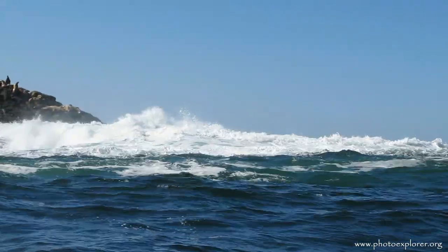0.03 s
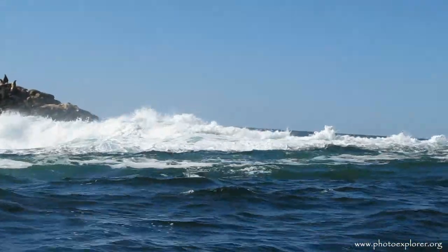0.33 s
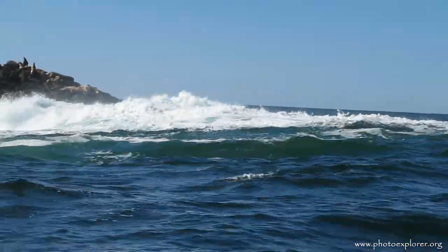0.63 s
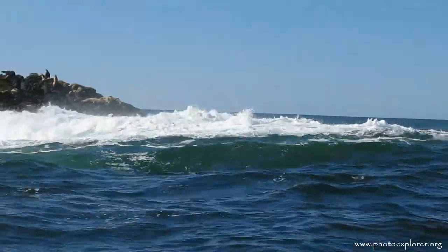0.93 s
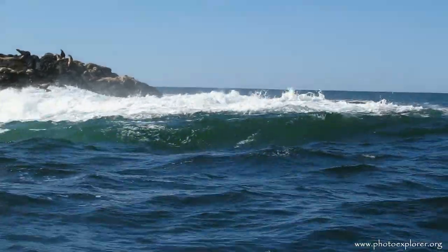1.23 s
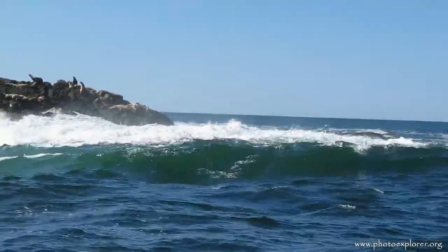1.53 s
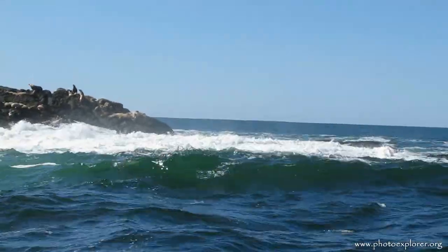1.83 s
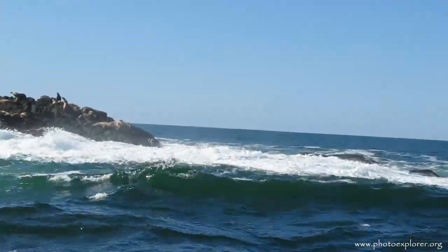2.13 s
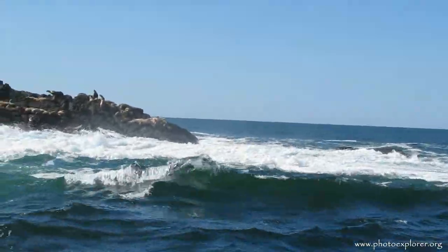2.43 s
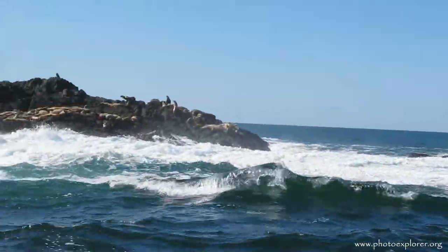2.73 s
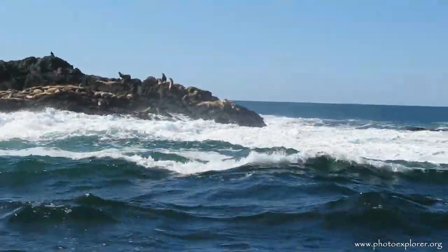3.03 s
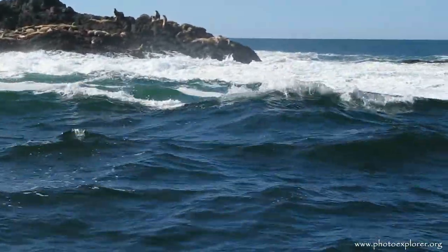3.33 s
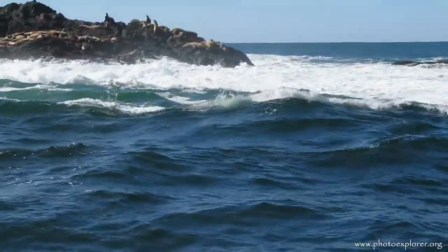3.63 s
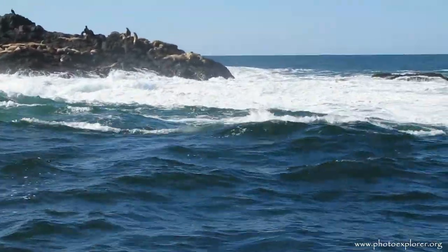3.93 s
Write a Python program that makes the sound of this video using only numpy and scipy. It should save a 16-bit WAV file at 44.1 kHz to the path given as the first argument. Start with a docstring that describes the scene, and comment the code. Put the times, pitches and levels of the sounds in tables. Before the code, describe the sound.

A small boat's engine idles with a low throb at sea, near surf breaking on rocks. Waves wash, slap and gulp against the hull, growing busier in the second half, while wind buffets the microphone.

```python
"""Small boat idling near surf

A small boat idles on a swell, off rocks where the surf breaks. Its engine throbs with each
firing, and the propeller hums. Waves wash along the hull, slap it, throw spray and gulp as
they trap air. Wind buffets the two microphone ports, and a faint squeal sounds early on."""
import sys
import numpy as np
from scipy import signal
from scipy.fft import rfft, irfft
from scipy.io import wavfile
from scipy.ndimage import uniform_filter1d

SR = 44100
rng = np.random.default_rng(int(sys.argv[2]) if len(sys.argv) > 2 else 0)


def int16_out(signal):
    """Quantize to a 16-bit WAV file."""
    q = np.round(np.clip(np.atleast_2d(signal).T, -1, 1) * 32767)
    wavfile.write(sys.argv[1], SR, q.astype(np.int16))


N = 176400
T = np.arange(N) / SR

# Engine speed. Each row: time in seconds, firings per second.
FIRING_RATE = [(0, 35.3), (.65, 35.9), (.8, 36.5), (.95, 36.2), (1.1, 36.45), (1.75, 36.25), (2.15, 36.45),
               (2.3, 36.8), (2.75, 36.8), (3.1, 36.55), (3.35, 36.1), (4, 36.0)]
# The exhaust as the boat rolls. Each row: time in seconds, then dB of harmonics 1, 2, 3 and 4.
EXHAUST_HARMONICS = [(0, -38, -23.5, -31, -37), (.25, -29, -19, -37, -35), (.58, -25, -19, -32, -37.5),
                     (.7, -27, -22.5, -21.5, -46), (.85, -24, -25, -25.5, -36.5), (1.1, -20, -22, -28, -38),
                     (1.35, -17.3, -22, -25.5, -35.5), (1.6, -16.5, -19.5, -28.5, -36.5),
                     (2, -24.5, -20, -47, -33), (2.3, -25.5, -17, -41, -33), (2.6, -22, -18, -25, -33.5),
                     (2.95, -22, -16, -31.5, -35.5), (3.15, -24.5, -21.5, -24, -32),
                     (3.4, -27, -21, -34, -33.5), (3.6, -22.5, -22.5, -24.5, -39),
                     (4, -20, -20, -29.5, -56)]
# Propeller and gear tones. Each row: multiple of the firing rate, level in dB before the load gain.
PROPELLER_TONES = [(4.25, -38.5), (4.76, -32), (5.25, -40.5), (5.8, -42.5), (21.35, -43.5), (30.2, -50.5),
                   (31.1, -52.5)]
# Waves along the hull. Each row: peak time, rise and fall in seconds, wash in dB, spray in dB,
# left minus right in dB.
WAVES = [(.32, 0.28, 0.079, -50, -60, -5), (.66, 0.058, 0.023, -38, -47.5, -1),
         (.765, 0.077, 0.057, -40, -40.5, 3.5), (1.02, 0.072, .06, -50, -55, 0),
         (1.37, 0.06, 0.042, -38.5, -48.5, 0), (2.09, 0.03, 0.059, -30.5, -43, -1.5),
         (2.225, .05, 0.034, -34.5, -48, 0), (2.36, 0.022, 0.02, -36, -62, -3),
         (2.75, 0.25, 0.23, -34.5, -63, -1.5), (2.9, 0.053, 0.06, -39, -56, 2),
         (3.03, 0.13, 0.064, -34.5, -47, -1.5), (3.35, 0.048, 0.095, -38, -45, -2),
         (3.58, 0.048, .08, -33, -39, -2.5), (3.71, 0.06, 0.12, -29.5, -37.5, -0.5),
         (3.8, 0.042, 0.06, -33, -42, -4)]
# Slaps on the hull. Each row: start in seconds, level in dB, pitch in Hz, width in octaves,
# seconds to the peak.
SLAPS = [(.215, -38.5, 1800, .12, .008), (0.641, -32, 770, 0.54, 0.026), (.705, -37, 2200, 0.8, 0.0054),
         (0.757, -30, 710, 0.38, 0.015), (0.972, -30, 390, .8, 0.033), (1.335, -29.5, 1920, 0.32, 0.0022),
         (2.012, -25.5, 320, 0.33, 0.013), (2.109, -32, 400, 0.46, .01), (2.142, -26.5, 332, .6, 0.01),
         (3.019, -35, 2980, 0.87, 0.011), (3.028, -22.5, 517, 1.1, .006), (3.272, -25.5, 380, 0.63, .016),
         (3.307, -27, 595, 0.81, 0.01), (3.566, -34.5, 3000, 0.56, .016), (3.67, -33, 400, 0.9, 0.062),
         (3.788, -37, 3500, 0.82, 0.0066)]
# Big bubbles. Each row: start in seconds, peak in dB, starting pitch in Hz, length in seconds.
GULPS = [(1.365, -31, 660, 0.017), (1.943, -23.5, 706, 0.01), (3.029, -16.5, 350, 0.01),
         (3.034, -30, 680, 0.01), (3.712, -13.5, 730, 0.01), (3.806, -13, 269, 0.014)]
# Single drops. Each row: start in seconds, level in dB, left minus right in dB.
DROPS = [(.734, -33, 2), (.977, -37, 0), (1.384, -42, 0), (1.4336, -35, 2.5), (2.231, -35, 0),
         (2.565, -38, 0), (2.66, -38, 0)]
# The squeal's two notes. Each row: pitch in Hz, level in dB before the squeal gain.
SQUEAL_TONES = [(2665, -47.5), (3385, -47.5)]
# How sounds grow and fade. Each row: time in seconds, gain in dB.
LOAD_GAIN = [(0, -4.5), (.7, 0.5), (1.2, -1), (1.85, -0.5), (2.15, 3.5), (2.6, 3.5), (3.05, 4.5),
             (3.35, -0.5), (3.55, -2), (4, -4)]  # for the propeller and the wake
WIND_GAIN = [(0, 2.5), (.35, 3), (.5, -0.5), (.67, 5.5), (.9, 3), (1.2, 1.5), (1.9, -1), (2.3, 1.5),
             (2.5, 4), (2.8, -2), (3.1, 6), (3.22, 11), (3.4, 8.5), (3.57, 5), (3.72, 8.5), (4, 4.5)]
SURF_GAIN = [(0, 1), (.3, 3.5), (.9, 3), (1.15, 0.5), (1.6, 4), (1.76, 1.5), (2.3, 5.5), (2.7, 3.3),
             (3.2, 6), (3.5, 5.5), (4, 7.5)]
SQUEAL_GAIN = [(.18, -25), (.22, -2), (.37, 2), (.45, -9), (.63, 0.5), (.72, -1.5), (.85, -40)]
# The colour (bass to treble) of each noise. Each row: frequency in Hz, relative level in dB.
WAKE_COLOUR = [(20, -6), (50, -6.5), (90, 2.5), (170, -4.5), (250, -4), (400, -10.5), (640, -16),
               (880, -11), (1140, -14.5), (1320, -23.5), (2500, -28), (8000, -60)]
WASH_COLOUR = [(100, -25), (350, 7), (900, 0), (2200, -1), (4000, -6.5), (6000, -20), (9000, -23.5),
               (15000, -41)]
SPRAY_COLOUR = [(1000, -15), (3500, 5.5), (7000, 1.5), (9000, -1.5), (11000, -2), (13000, -6), (14500, -13),
                (15700, -30)]
DROP_COLOUR = [(500, -25), (3000, -8), (6000, -4), (10500, 2), (13000, -11), (15500, -34)]
WIND_COLOUR = [(10, -37), (23, -9), (35, -0.5), (70, -4), (130, -2.5), (250, -14.5), (450, -26),
               (1000, -38), (4000, -71)]
SURF_COLOUR = [(100, -24), (500, 6.5), (1300, 1), (2400, -3), (4000, -5.5), (6000, -11.5), (9000, -18),
               (12000, -24), (15500, -39)]
CREST_COLOUR = [(2000, -20), (4500, -2), (6000, 2), (7800, -2), (9500, -11), (12000, -27), (15000, -42)]
# How the two ports hear the sea. Each row: frequency in Hz, likeness (1 means alike),
# how far left leads in radians, left minus right in dB.
PORTS = [(96, 1, 0.98, -2.5), (620, 0.93, -0.6, 0.8), (1060, 0.94, 1, 1.5), (1460, 0.46, .5, 1),
         (1870, 0.27, -0.7, -4), (2600, 0.16, -1, 0), (3930, 0.08, -1, 2.5), (5440, .03, -0.5, 3),
         (7100, 0.19, -3, 1.5), (9200, 0.13, -1, 4), (10400, 0.47, -1.9, 1.3), (12500, 0.15, 1.5, 1),
         (13700, .04, 1, 0)]


def exhaust(firing_phase, db_per_octave=-10, waver_db=2, skew_rad=0.72, smear_rad=0.1145):
    """Each firing makes one lopsided pulse; the roll of the boat changes its colour."""
    *levels_db, fourth_db = curves(EXHAUST_HARMONICS)
    for k in range(4, 14):
        levels_db.append(fourth_db + db_per_octave * np.log2(k / 4) + waver_db * wander(10))
    pulses = np.zeros(N)
    for k, db in enumerate(levels_db, 1):
        lag = skew_rad + smear_rad * (k - 1) ** 2  # the hull delays the higher harmonics
        pulses -= amp(db) * np.cos(k * firing_phase - lag)
    return np.sqrt(2) * pulses * pan(-1.0)


def propeller(firing_phase, waver_db=0.5, drift_hz=0.78):
    """The blades hum and the gears whine, wavering but tied to the engine speed."""
    tones = np.zeros(N)
    for ratio, db in PROPELLER_TONES:
        gain = amp(db + waver_db * wander(6.4))
        tones += gain * np.sin(ratio * firing_phase + phase(drift_hz * wander(7.0)))
    return np.sqrt(2) * tones * amp(curves(LOAD_GAIN)[0]) * pan(-0.024)


def wake(firing_phase, level_db=-27.5):
    """The exhaust churns the water, which throbs with each firing."""
    churn = water_noise(WAKE_COLOUR, patchy_db=1.0, flicker_db=-0.1)
    throb = 1 + 0.12 * np.cos(firing_phase)
    return churn * throb * amp(level_db + curves(LOAD_GAIN)[0])


def waves():
    """Each wave swells along the hull as a wash with a brighter spray, both full of droplets."""
    wash_power, spray_power = np.zeros((2, 2, N))
    for peak, rise, fall, wash_db, spray_db, side_db in WAVES:
        shape = pan(side_db) * swell(peak, rise, fall)
        wash_power += (amp(wash_db) * shape) ** 2
        spray_power += (amp(spray_db) * shape) ** 2
    wash = water_noise(WASH_COLOUR, patchy_db=2, flicker_db=0.8) + amp(-6.5) * droplets(WASH_COLOUR)
    spray = water_noise(SPRAY_COLOUR, patchy_db=2.5, flicker_db=1.4) + amp(-7) * droplets(SPRAY_COLOUR)
    return np.sqrt(wash_power) * wash + np.sqrt(spray_power) * spray


def droplets(colour, per_second=2200, pitches=28, cycles=3.3, spread_db=2.5):
    """Many tiny bubbles burst, each ringing for a few cycles of a rising note."""
    out = np.zeros((2, N))
    for hz in np.geomspace(1200, 14000, pitches):
        age = np.arange(0, 6, hz / SR / cycles)
        ping = unit(age * np.exp(-2 * age) * np.sin(2 * np.pi * cycles * age * (1 + 0.015 * age)))
        sizes = amp(spread_db * np.minimum(rng.exponential(1, (2, N)), 4))
        bursts = sizes * (rng.random((2, N)) < per_second / pitches / SR)
        out += hz * amp(spectra(colour, hz)[0]) * signal.oaconvolve(bursts, ping[None], axes=1)[:, :N]
    return unit(out)


def slaps():
    """Water smacks the hull, each time with a short burst of noise around one pitch."""
    out, t = np.zeros((2, N)), T[:8192]
    hz = np.fft.rfftfreq(len(t), 1 / SR)
    for start, db, pitch, width, rise in SLAPS:
        band = np.exp(-0.5 * (np.log2((hz + 1) / pitch) / width) ** 2)
        thud = unit(irfft(rfft(rng.standard_normal(len(t))) * band))
        add(out, start, amp(db) * thud * t / rise * np.exp(1 - t / rise))
    return out


def gulps(pitch_rise=0.42):
    """Big bubbles of trapped air each ring with a quick rising note."""
    out = np.zeros((2, N))
    for start, db, pitch, length in GULPS:
        progress = np.minimum(T[:8192] / length, 1)
        note = np.sin(phase(pitch * (1 + pitch_rise * progress)))
        add(out, start, amp(db) * np.sin(np.pi * progress) * note)
    return out


def drops(decay_s=0.0015):
    """Single drops land with bright ticks."""
    out, t = np.zeros((2, N)), T[:8192]
    for start, db, side_db in DROPS:
        tick = unit(tint(rng.standard_normal((2, len(t))), DROP_COLOUR))
        add(out, start, amp(db) * pan(side_db) * tick * np.exp(-t / decay_s))
    return out


def wind(level_db=-28, lumpy_db=1.0, shared=0.82):
    """Wind buffets the ports with a lumpy rumble, mostly different at each one."""
    white = rng.standard_normal((2, N)) + shared * rng.standard_normal(N)
    lumps = amp(lumpy_db * np.array([wander(8.9), wander(13.0)]))
    return unit(tint(white, WIND_COLOUR) * lumps) * amp(level_db + curves(WIND_GAIN)[0])


def surf(level_db=-38):
    """Breakers on the rocks make an even rush."""
    rush = water_noise(SURF_COLOUR, patchy_db=1.52, flicker_db=0.97)
    return rush * amp(level_db + curves(SURF_GAIN)[0])


def crest(level_db=-40):
    """A nearby crest spills over in a growing hiss."""
    hiss = water_noise(CREST_COLOUR, patchy_db=1.5, flicker_db=1.0)
    return hiss * amp(level_db) * swell(peak_s=3.025, rise_s=0.34, fall_s=0.092) * pan(-2.0)


def squeal(waver_db=1.7, jitter_hz=9):
    """A thin, unsteady squeal, perhaps of something rubbing on the boat."""
    tones = np.zeros((2, N))
    for side in tones:
        for hz, db in SQUEAL_TONES:
            side += amp(db + waver_db * wander(18)) * np.sin(phase(hz + jitter_hz * wander(54)))
    return np.sqrt(2) * tones * amp(curves(SQUEAL_GAIN)[0])


def water_noise(colour, patchy_db, flicker_db):
    """Noise that comes in short random patches, as the two ports hear it."""
    frames, bands = N // 128 + 6, 257
    patches = uniform_filter1d(rng.standard_normal((frames, bands)), size=10, axis=0)
    patches = unit(uniform_filter1d(patches, size=7, axis=1))
    flicker = unit(uniform_filter1d(rng.standard_normal((frames, 1)), size=6, axis=0))
    grid = signal.stft(rng.standard_normal((2, N)), nperseg=512, noverlap=384)[2]
    grid *= amp(patchy_db * patches + flicker_db * flicker).T[:, :grid.shape[2]]
    common, separate = rfft(signal.istft(grid, nperseg=512, noverlap=384)[1][:, :N])
    hz = np.fft.rfftfreq(N, 1 / SR)
    likeness, lead, side_db = spectra(PORTS, hz)
    left = common * np.exp(1j * lead) * amp(side_db / 2)
    right = (likeness * common + np.sqrt(1 - likeness ** 2) * separate) * amp(-side_db / 2)
    return unit(irfft(np.array([left, right]) * amp(spectra(colour, hz)[0]), N))


def amp(db):
    """Turns decibels into a gain."""
    return 10 ** (np.asarray(db) / 20)


def unit(x):
    """Scales a signal to an average power of 1."""
    return x / np.sqrt(np.mean(x ** 2) + 1e-20)


def phase(hz):
    """Adds up a changing frequency into an angle in radians."""
    return 2 * np.pi * np.cumsum(hz) / SR


def curves(table):
    """Joins the rows of a time table with straight lines, one curve per column."""
    times, *columns = np.transpose(table)
    return [np.interp(T, times, column) for column in columns]


def spectra(table, hz):
    """Reads each column of a frequency table at hz, on a log scale."""
    row_hz, *columns = np.transpose(table)
    return [np.interp(np.log(hz + 1), np.log(row_hz + 1), column) for column in columns]


def tint(noise, colour):
    """Filters noise to give it a colour."""
    hz = np.fft.rfftfreq(noise.shape[-1], 1 / SR)
    return irfft(rfft(noise) * amp(spectra(colour, hz)[0]))


def pan(db):
    """Left and right gains; positive dB favours the left."""
    return amp(np.array([[db], [-db]]) / 2)


def add(mix, start_s, sound):
    """Mixes a sound in at its start time."""
    part = mix[:, max(round(start_s * SR), 0):][:, :sound.shape[-1]]
    part += sound[..., :part.shape[1]]


def wander(rate_hz):
    """A smooth random wobble, mostly slower than rate_hz."""
    hz = np.fft.rfftfreq(N, 1 / SR)
    return unit(irfft(rfft(rng.standard_normal(N)) * (hz > 0) * np.exp(-(hz / rate_hz) ** 2), N))


def swell(peak_s, rise_s, fall_s):
    """A curve that grows to a rounded peak and dies away."""
    return 1 / np.cosh(np.clip((T - peak_s) / np.where(T < peak_s, rise_s, fall_s), -20, 20))


def scene():
    """Boat, sea and wind together."""
    firing_phase = phase(curves(FIRING_RATE)[0])
    boat = exhaust(firing_phase) + propeller(firing_phase) + wake(firing_phase)
    return boat + surf() + waves() + slaps() + gulps() + drops() + wind() + crest() + squeal()


def record(dry):
    """Cuts off the very highest treble."""
    taps = signal.firwin(511, cutoff=15650, window=("kaiser", 9), fs=SR)
    padded = np.pad(dry, ((0, 0), (len(taps) // 2, len(taps) // 2)), "reflect")
    return signal.oaconvolve(padded, taps[None], "valid", axes=1)


dry = scene()
out = record(dry)
int16_out(out)
```